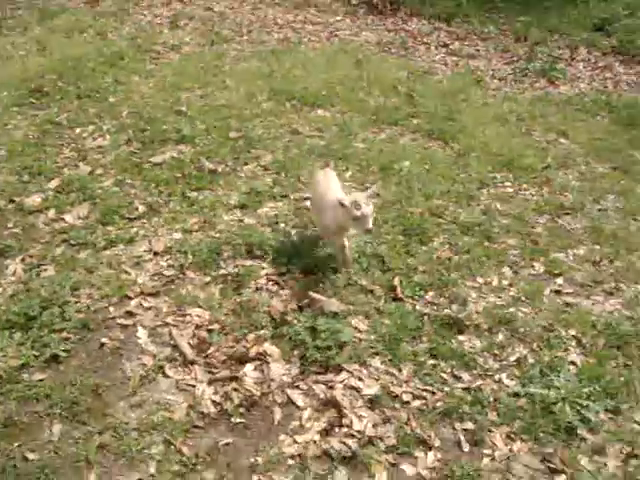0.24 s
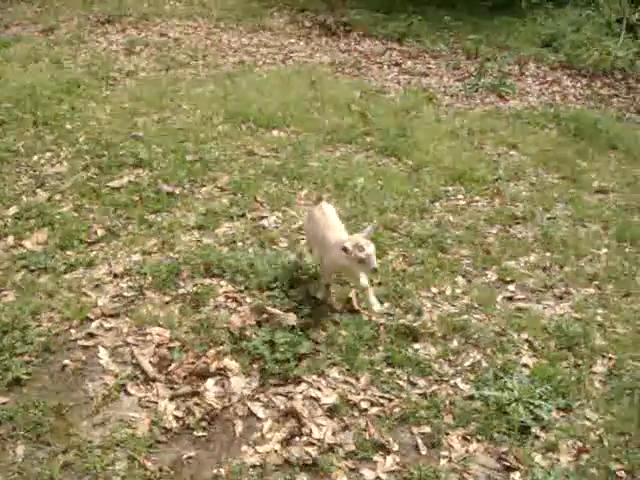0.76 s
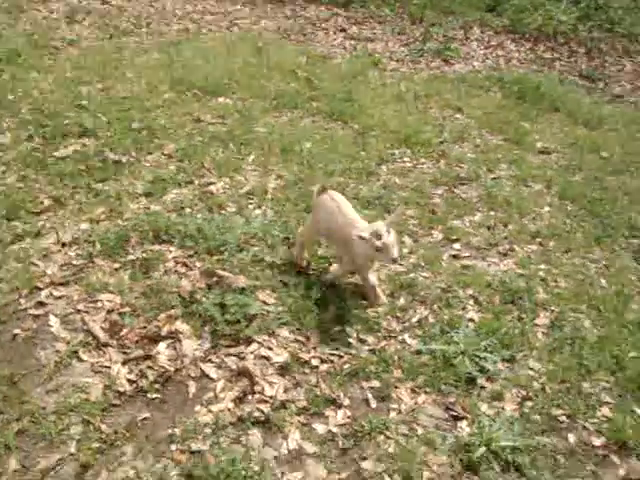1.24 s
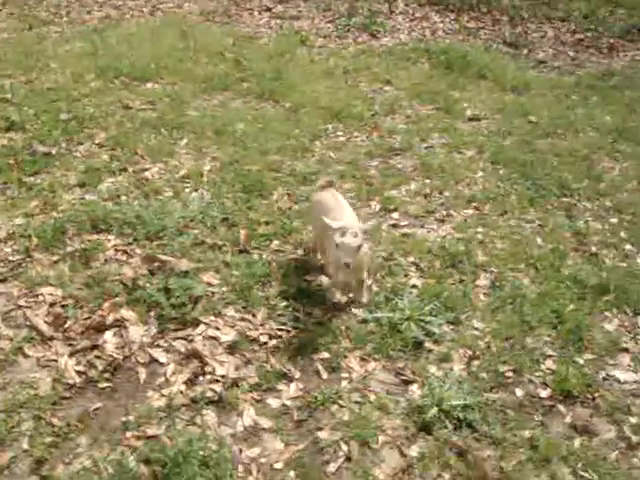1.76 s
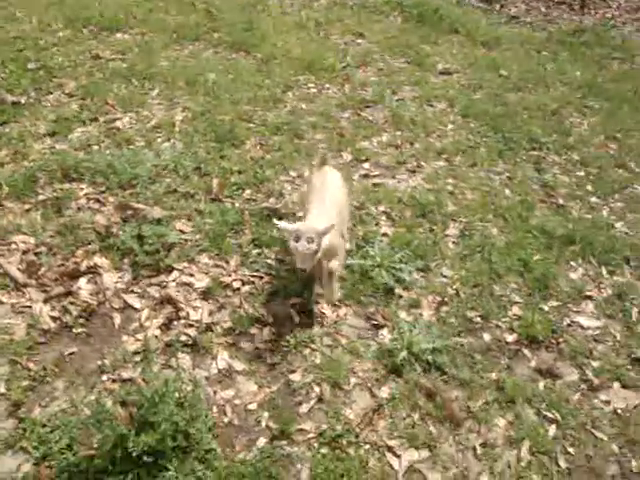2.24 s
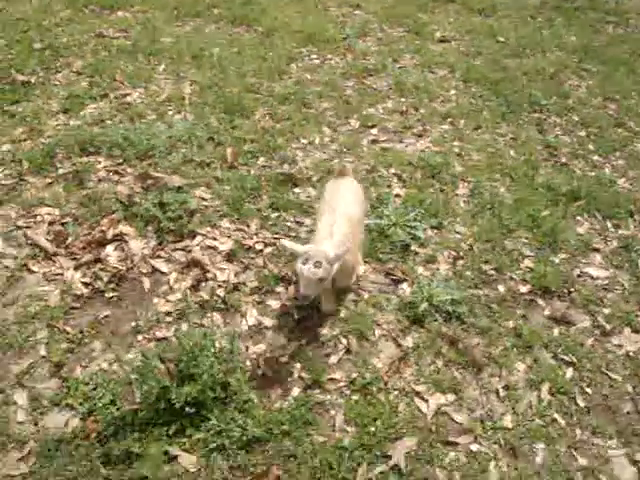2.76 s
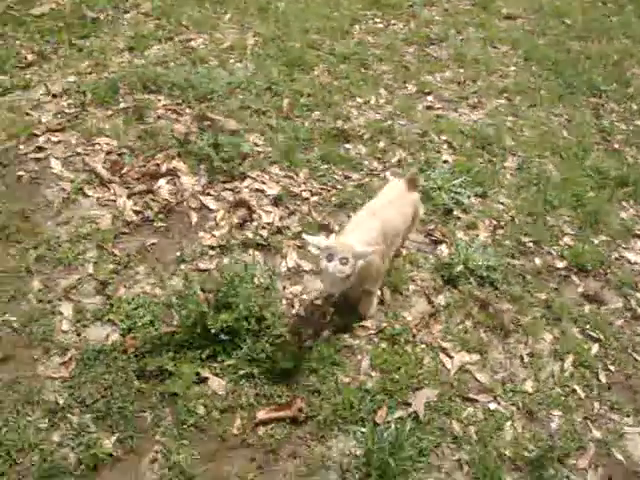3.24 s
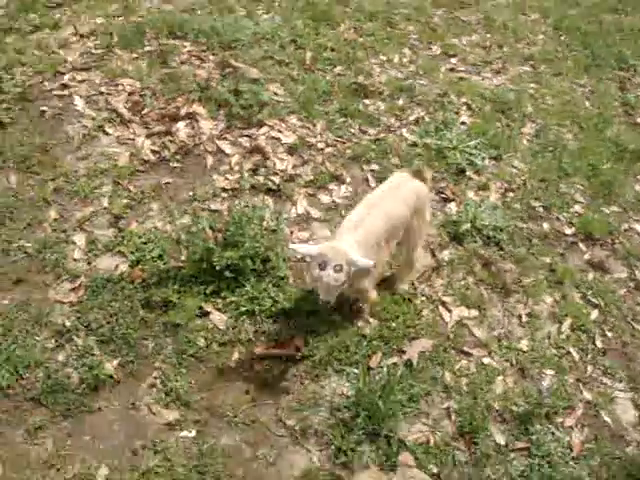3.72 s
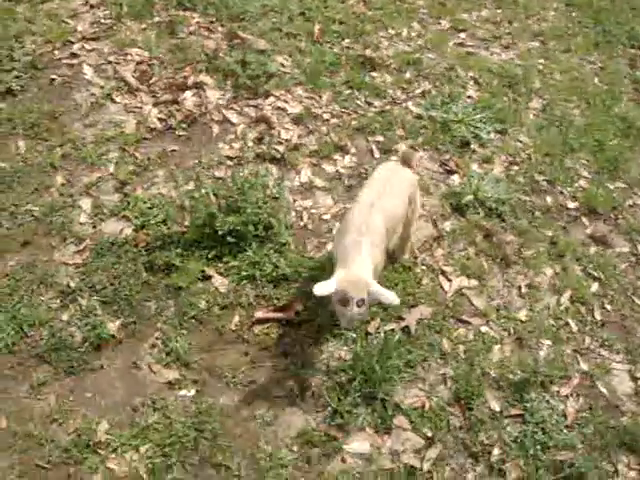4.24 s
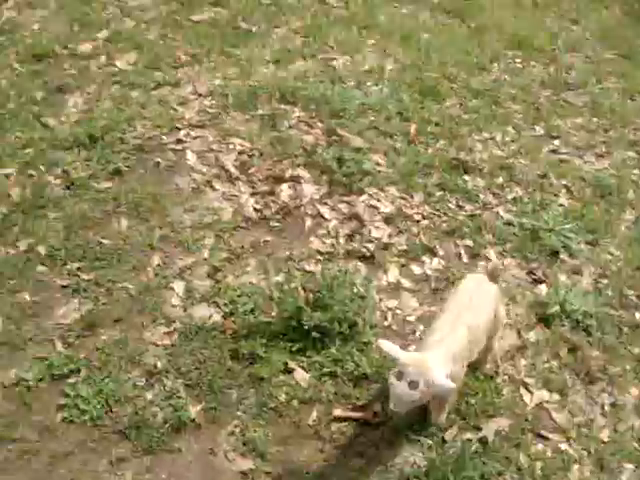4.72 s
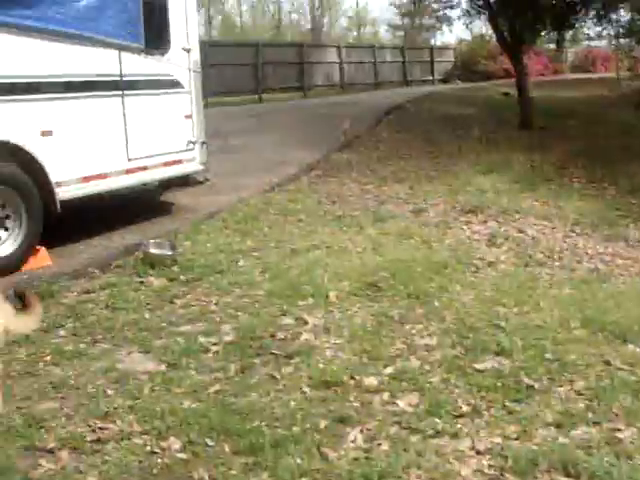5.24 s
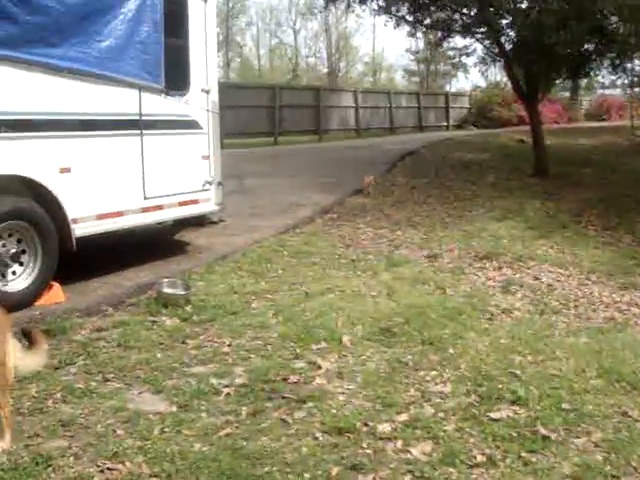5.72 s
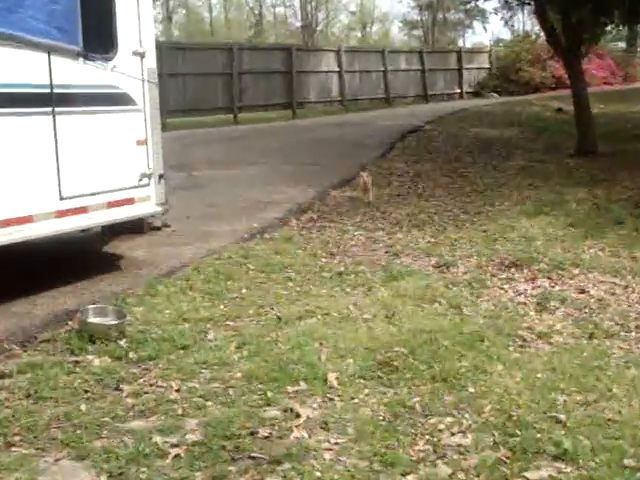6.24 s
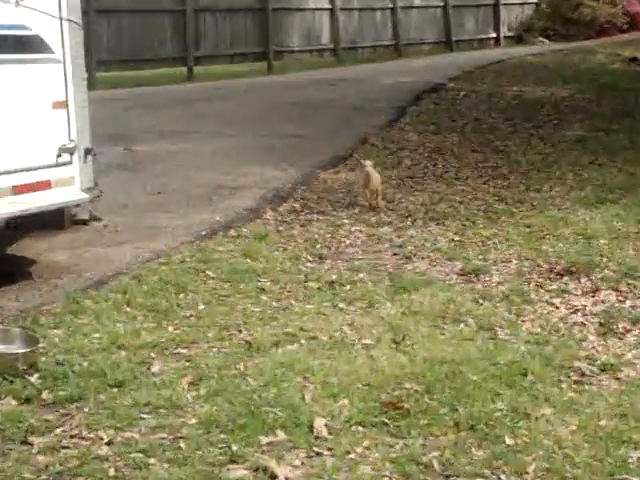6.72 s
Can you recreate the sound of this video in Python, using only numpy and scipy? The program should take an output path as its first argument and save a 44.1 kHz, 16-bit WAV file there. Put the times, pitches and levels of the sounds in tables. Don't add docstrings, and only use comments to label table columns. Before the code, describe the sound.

In an open yard, a kid goat steps through crisp leaves and bleats long and shrill, followed by repeated echoing birdsong and faint distant bleats.

```python
import sys
import numpy as np
from scipy import signal
from scipy.fft import rfft, irfft
from scipy.io import wavfile
from scipy.ndimage import uniform_filter1d, minimum_filter1d

SR = 44100
rng = np.random.default_rng(int(sys.argv[2]) if len(sys.argv) > 2 else 0)


def linear_from_db(decibels):
    return 10 ** (np.asarray(decibels, float) / 20)


def int16_out(signal):
    q = np.round(np.clip(np.atleast_2d(signal).T, -1, 1) * 32767)
    wavfile.write(sys.argv[1], SR, q.astype(np.int16))


N = 307818


def evened(x):
    return x / np.sqrt(np.mean(x ** 2) + 1e-20)


def columns(rows, t):
    s, *rest = np.transpose(rows)
    return [np.interp(t, s, c) for c in rest]


def span(rows):
    return np.arange(rows[0][0], rows[-1][0], 1 / SR)


def add(mix, s, sound):
    sound = sound[max(0, -round(s * SR)):]
    part = mix[max(0, round(s * SR)):][:len(sound)]
    part += sound[:len(part)]


def wander(n, hz):
    return evened(signal.lfilter(*signal.butter(2, hz, fs=SR), rng.standard_normal(n)))


def coloured(x, spectrum):
    hz = np.fft.rfftfreq(len(x), 1 / SR)
    f, db = np.transpose(spectrum)
    gain = linear_from_db(np.interp(np.log(hz + 1), np.log(f), db))
    return irfft(rfft(x) * gain, len(x))


def band(x, hz, width):
    b, a = signal.iirpeak(hz, hz / width, fs=SR)
    return signal.lfilter(b, a, signal.lfilter(b, a, x))


def swells(rows, t, power=1):
    swell_db = 15
    s, db, rise, fall = np.transpose(rows)[:, :, None]
    away = np.maximum((s - t) / rise, (t - s) / fall)
    return (db - swell_db * away ** power).max(0)


def hush():
    # frequency in Hz, level in dB per Hz.
    air_spectrum = [(15, -42.5), (25, -12.5), (128, 1.5), (171, 2), (228, 3.5), (492, 3), (689, 1),
                    (1060, -0.5), (1890, -3.5), (3210, -4), (5570, -10), (7260, -10.5), (7800, -20),
                    (10100, -42), (17200, -120)]
    level_db = -51 + 0.96 * wander(N, 7.6)
    return linear_from_db(level_db) * evened(coloured(rng.standard_normal(N), air_spectrum))


def motor():
    # time in seconds, level in dB.
    hum_level = [(0, -85), (.56, -65), (1.5, -66.5), (1.83, -61.5), (2.9, -72), (3.87, -62.5), (4.49, -80),
                 (5.17, -58.5), (5.37, -70), (5.52, -60.5), (6.42, -56.5), (6.98, -61)]
    motor_hz, drift = 181.9, .012
    db, = columns(hum_level, np.arange(N) / SR)
    turns = np.cumsum(motor_hz * (1 + drift * wander(N, 3))) / SR
    hum = np.cos(2 * np.pi * turns) + linear_from_db(-10.0) * np.cos(np.pi * turns)
    return np.sqrt(2) * linear_from_db(db + 0.51 * wander(N, 4.9)) * hum


def insect():
    # centre in Hz, width in Hz, level in dB.
    wing_modes = [(8750, 530, -61.5), (9400, 460, -65), (9786, 69, -73), (7920, 670, -75)]
    # time in seconds, strokes per second, level in dB.
    wing_beat = [
        (0.0, 64.1, 8),
        (5.17, 64.1, 10),
        (5.29, 65.0, 10),
        (6.98, 65.1, 9.5),
    ]
    rate, db = columns(wing_beat, np.arange(N) / SR)
    beat = .5 + .5 * np.cos(2 * np.pi * np.cumsum(rate) / SR)
    stroke = beat ** 0.2 * linear_from_db(0.76 * wander(N, 30))
    out = 0
    for k, (hz, width, mode_db) in enumerate(wing_modes):
        hiss = band(rng.standard_normal(N), hz, width)
        leak = 0.026 + 0.043 * k
        out = out + linear_from_db(mode_db) * evened(hiss * (stroke + leak))
    return out * linear_from_db(db)


def knocks():
    wood_hz = [640, 1000, 1450]
    out, u = np.zeros(N), np.arange(1500) / SR
    wood = sum(np.sin(2 * np.pi * hz * u) for hz in wood_hz)
    add(out, 5.654, linear_from_db(-41) * wood * np.exp(-u / 0.0042))
    v = 2 * np.pi * 130 * u
    add(out, 6.9662, linear_from_db(-13) * v * (1 - v / 3) * np.exp(-v))
    return out


def leaves():
    # peak in seconds, level in dB, rise and fall in seconds.
    steps = [(0, -51, .02, 0.022), (.18, -68.5, .6, 0.68), (0.321, -63, 0.0061, 0.014),
             (.45, -53, 0.039, 0.062), (.53, -64, .05, 0.083), (.88, -55.5, 0.026, 0.034),
             (.99, -55, 0.039, .015), (1.065, -55.5, 0.043, 0.041), (1.16, -77, .04, .09),
             (1.265, -58.5, 0.0064, 0.27), (1.48, -55.5, 0.13, .05), (1.575, -56, 0.11, .33),
             (2.0, -61, 0.048, 0.029), (2.15, -66, 0.56, 0.62), (2.28, -56.5, 0.044, 0.074),
             (2.41, -52, 0.0093, .03), (2.51, -55.5, 0.074, 0.026), (2.55, -63, 0.055, 0.74),
             (2.87, -59.5, 0.14, 0.83), (3.19, -58, .1, 0.017), (3.3, -73, .9, .5), (3.7, -71, 0.093, .065),
             (3.85, -67, .9, .45), (4.13, -65, .04, .1), (4.34, -67, 0.071, 0.15)]
    # frequency in Hz, level in dB per Hz.
    leaf_spectrum = [(290, -20), (500, 5), (723, -14), (922, -1.5), (2860, 5.5), (6980, 5.5), (9600, 4.5),
                     (10500, -18), (13600, -53), (22000, -120)]
    # start in seconds, peak level in dB, ring in Hz.
    twigs = [(0.32, -30.5, 7550), (0.423, -33, 6310), (0.4324, -28, 4450), (0.4568, -22.5, 2940),
             (0.4692, -22.5, 6960), (0.4799, -25.5, 4320), (0.635, -36, 2860), (0.8609, -29.5, 4800),
             (0.8767, -25.5, 5100), (0.8888, -27.5, 8270), (1.024, -32, 3046), (1.0344, -33, 3000),
             (1.0816, -31, 2830), (1.2601, -26, 3020), (1.48, -25.5, 2970), (1.504, -36, 3590),
             (3.1824, -29.5, 4520), (3.695, -29.5, 3680), (4.3433, -34.5, 3270), (4.581, -26.5, 7940),
             (4.76, -36, 3330), (5.17, -37, 3436), (5.6277, -36, 3290), (5.6546, -34.5, 3930),
             (6.4713, -37, 4900), (6.793, -26, 3300), (6.967, -18.5, 3340)]
    out, t = np.zeros(N), np.arange(0, steps[-1][0] + .5, 1 / SR)
    grain_db = 3.9 * np.minimum(rng.exponential(1, len(t)), 3)
    grains = rng.standard_normal(len(t)) * linear_from_db(grain_db) * (rng.random(len(t)) < .3)
    add(out, 0, evened(coloured(grains, leaf_spectrum)) * linear_from_db(swells(steps, t) + 12.5))
    u = np.arange(500) / SR
    for s, db, hz in twigs:
        crack = coloured(rng.standard_normal(500) * np.exp(-u / 0.0023), leaf_spectrum)
        snap = crack + 1.35 * np.sin(2 * np.pi * hz * u) * np.exp(-u / 0.0016)
        add(out, s, linear_from_db(db) * snap / abs(snap).max())
    return out


def yard(x, wet_db):
    # delay in seconds, level in dB, band centre in Hz, width in Hz.
    slaps = [
        (.0125, 0.5, 3430, 1240),
        (.039, 0, 2815, 1940),
        (0.084, -10.5, 3000, 2500),
    ]
    t60 = .55
    t = np.arange(SR) / SR
    tail = rng.choice([-1., 1.], SR) * (rng.random(SR) < 2500 / SR)
    tail *= linear_from_db(-60 * t / t60) + 2.2 * np.exp(-t / .011)
    wet = signal.fftconvolve(x, tail / np.linalg.norm(tail))[:N]
    for delay, db, hz, width in slaps:
        add(wet, delay, linear_from_db(db) * band(x, hz, width))
    return x + linear_from_db(wet_db) * wet


def birds():
    # time from the note's start in seconds, pitch in Hz, level in dB.
    slur_up = [(-.135, 1745, -23), (-.11, 1810, -16.5), (-.07, 1960, -10), (-.035, 2223, -6.5),
               (-.025, 2182, -36)]
    slur_down = [(-.004, 3570, -40), (0, 3710, -1.5), (.02, 3576, -14.5), (.045, 3200, -7),
                 (.068, 2450, -31)]
    sweep_up = [(-.115, 1270, -31), (-.06, 1650, -22), (-.025, 1830, -21.5), (-.015, 1800, -40)]
    sweep_down = [(-.004, 6750, -30), (0, 7000, -17), (.015, 6400, -12), (.04, 4340, -2),
                  (.062, 2460, -7.5), (.07, 2160, -27)]
    chip = [(0, 7630, -5.5), (.006, 6910, 0), (.014, 6370, -1), (.035, 6620, -8.5), (.045, 7060, -39)]
    # start in seconds, level in dB, pitch factor.
    slurs = [
        (3.625, -52, 1),
        (4.13, -47.5, 1),
        (4.426, -44.5, 0.98),
        (4.74, -45, 0.95),
        (5.038, -41.5, 0.99),
    ]
    sweeps = [
        (0.076, -48, 0.94),
        (5.264, -45, 0.98),
        (5.506, -44.5, 0.96),
        (5.747, -45, 0.94),
        (5.986, -44, 0.94),
        (6.225, -46, 0.9),
        (6.468, -44, 0.93),
        (6.705, -46.5, 0.95),
        (6.946, -45, 0.92),
    ]
    chips = [
        (0.512, -62, .41),
        (0.801, -60.5, 0.43),
        (1.98, -47.5, 1.03),
        (4.995, -55, 1.105),
        (5.245, -46.5, 1.03),
    ]
    out = np.zeros(N)
    for shape, notes in ((slur_up, slurs), (slur_down, slurs), (sweep_up, sweeps),
                         (sweep_down, sweeps), (chip, chips)):
        hz, shape_db = columns(shape, span(shape))
        for s, db, factor in notes:
            tone = np.sin(2 * np.pi * np.cumsum(hz * factor) / SR)
            level = linear_from_db(db + shape_db + 2.6 * wander(len(hz), 130))
            add(out, s + shape[0][0], np.sqrt(2) * level * tone)
    return out


def far_goat():
    # time in seconds, pitch in Hz, level in dB.
    calls = [
        [(5.75, 890, -72), (5.762, 903, -56), (5.798, 896, -48), (5.83, 932, -66)],
        [(5.9, 1067, -66), (5.924, 982, -47.5), (5.98, 983, -56), (6.11, 1031, -51), (6.138, 967, -47),
         (6.19, 992, -57), (6.274, 958, -50.5), (6.3, 1055, -58)],
    ]
    call_partials = [
        [0, -6, -6],
        [0, -15, -18],
    ]
    out = np.zeros(N)
    for rows, partials_db in zip(calls, call_partials):
        hz, db = columns(rows, span(rows))
        turns = np.cumsum(hz) / SR
        call = sum(linear_from_db(p) * np.cos(2 * np.pi * k * turns) for k, p in enumerate(partials_db, 1))
        add(out, rows[0][0], np.sqrt(2) * linear_from_db(db) * call * signal.windows.tukey(len(hz), .2))
    return out


def rasp(level_db, modes):
    air = rng.standard_normal(len(level_db))
    rings = sum(linear_from_db(db) * evened(band(air, hz, width)) for hz, width, db in modes)
    return rings * linear_from_db(level_db)


def syllable(rows):
    # time in seconds, hoarseness 0-1, flutter depth 0-1, half-pitch lines in dB.
    manner = [
        (2.2, .13, .15, -35),
        (2.35, .07, .58, -40),
        (2.62, .08, .7, -40),
        (2.93, .015, .03, -40),
        (3.7, .015, .03, -40),
        (3.78, .18, .4, -18),
        (3.9, .04, .1, -14),
        (4.04, .08, .2, -2),
        (4.1, .2, .42, -15),
    ]
    # peak in seconds, level in dB, rise and fall in seconds.
    pushes = [(1.765, -36, 0.078, 0.14), (1.9, -41.5, 0.23, 0.1), (2.0, -45.5, .15, 0.084),
              (2.08, -34, .05, 0.12), (2.2, -37.5, .2, .1), (2.255, -35, 0.017, 0.057),
              (2.348, -30.5, 0.087, 0.073), (2.47, -32, 0.37, 0.28), (2.679, -28, 0.082, 0.14),
              (2.79, -32, .3, 0.079), (2.97, -28.5, 0.14, 0.13), (3.22, -34, 0.1, 0.17),
              (3.375, -30, 0.07, 0.065), (3.445, -35, 0.046, 0.016), (3.522, -29, 0.05, 0.059),
              (3.62, -41, 0.11, 0.042), (3.685, -24, 0.026, 0.036), (3.73, -29.5, 0.052, 0.086),
              (3.853, -38.5, 0.1, .1), (3.96, -32, 0.067, 0.062), (4.06, -42.5, .15, 0.22)]
    # frequency in Hz, share that follows the pushes 0-1, level in dB.
    throat = [(720, 0.07, 1), (1030, 0.73, -5), (1120, 1, -1.5), (1460, 1, 1.5), (1650, 0.3, -10),
              (1863, 0.34, -12.5), (2520, 0, -31)]
    # start and end in seconds, partial number, level in dB.
    overtones = [(2.27, 2.5, 4, -53), (2.7, 2.95, 4, -53), (2.92, 3.2, 4, -45), (3.15, 3.4, 4, -49),
                 (3.36, 3.57, 4, -57), (2.45, 2.75, 4, -58), (1.77, 1.83, 7, -60), (2.08, 2.16, 6, -55),
                 (2.33, 2.82, 6, -61), (2.33, 2.72, 12, -60), (2.8, 3.11, 10, -56), (3.29, 3.52, 7, -50),
                 (3.48, 3.72, 7, -60), (3.51, 3.64, 9, -55), (3.64, 3.8, 9, -60), (3.78, 4.08, 9, -60),
                 (3.89, 3.95, 12, -62)]
    flutter_hz, ring_hz, capture_hz, pull = 32.82, 1305, 175, 8
    settle_s = 3.0
    t = span(rows)
    hz, effort_db = columns(rows, t)
    hoarse, flutter, half_db = columns(manner, t)

    off = ring_hz - 2 * hz
    pulled = np.minimum(pull * hoarse, 1) * (t < settle_s) * np.exp(-(off / capture_hz) ** 6)
    second_hz = 2 * hz + off * pulled

    flutter_rate = flutter_hz * (1 + .2 * wander(len(t), 10))
    shake = np.cos(2 * np.pi * np.cumsum(flutter_rate) / SR) * (1 + .15 * wander(len(t), 12))
    jitter = 1 + 0.15 * hoarse * wander(len(t), 73) + 0.012 * flutter * shake
    turns = np.cumsum(hz * jitter) / SR
    voice, ring_db = 0, swells(pushes, t, 2)
    for k in range(1, 5):
        share, throat_db = columns(throat, second_hz if k == 2 else k * hz)
        db = throat_db + effort_db + np.clip(share, 0, 1) * (ring_db - effort_db)
        shimmer = 1 + flutter * shake * min(k / 2, 1) + 1.2 * hoarse * wander(len(t), 100)
        own = np.cumsum(second_hz * jitter) / SR if k == 2 else k * turns
        voice = voice + linear_from_db(db) * shimmer * np.cos(2 * np.pi * own)
        if k > 1:
            half_line = np.cos(2 * np.pi * (k - .5) * turns)
            voice = voice + linear_from_db(db + half_db - 8.2 * (k == 2)) * half_line
    for start, end, k, db in overtones:
        if start >= t[-1] or end <= t[0]:
            continue
        gate = np.clip(np.minimum(t - start, end - t) / .04, 0, 1)
        level = linear_from_db(db + 1.3 * wander(len(t), 45))
        voice = voice + gate * level * np.cos(2 * np.pi * k * turns)
    return np.sqrt(2) * voice * signal.windows.tukey(len(t), 0.013 / (t[-1] - t[0]))


def near_goat():
    # time in seconds, pitch in Hz, effort in dB.
    stammer = [
        [(1.68, 522.5, -57), (1.734, 536, -44), (1.75, 622, -40), (1.77, 658, -43), (1.854, 643, -38),
         (1.921, 576, -55), (1.965, 646, -60), (2.033, 647, -57)],
        [(2.035, 523, -47), (2.051, 583, -46), (2.065, 622, -33.5), (2.077, 655, -43), (2.147, 623, -33),
         (2.231, 589, -67.5)],
    ]
    long_call = [
        [(2.232, 556, -44.5), (2.25, 635, -33.5), (2.28, 703, -47), (2.348, 676.2, -38), (2.414, 663, -45.5),
         (2.47, 654, -35.5), (2.7, 660, -35.5), (2.73, 621.4, -31.5), (2.815, 650, -45)],
        [(2.81, 637, -39), (2.865, 656, -41.5), (3.126, 658.5, -43), (3.2, 658.7, -50.5), (3.33, 656.6, -48),
         (3.395, 650, -55.5), (3.61, 640, -44), (3.647, 634, -53), (3.765, 613.4, -34)],
        [(3.765, 556.5, -35), (3.801, 518.3, -43), (3.853, 510, -36), (3.905, 499, -49), (3.965, 498.8, -41),
         (4.014, 485.3, -45.5), (4.09, 469, -51), (4.12, 449, -58), (4.212, 441, -67)],
    ]
    # peak in seconds, level in dB, rise and fall in seconds.
    onset_air = [
        (1.726, -45, 0.052, 0.32),
        (1.89, -40.5, 0.048, 0.028),
        (2.036, -42, 0.0082, .04),
        (2.08, -46, 0.056, 0.39),
        (2.248, -43, .28, 0.076),
    ]
    # centre in Hz, width in Hz, level in dB.
    rasp_modes = [(1061, 29, 4), (955, 91, -5), (1170, 110, 0), (1530, 160, -7), (1827, 100, -2.5),
                  (2880, 65, -11.5)]
    # time in seconds, level in dB.
    wheeze = [(4.07, -62), (4.11, -42), (4.196, -46), (4.22, -52), (4.29, -54), (4.376, -68), (4.4, -55)]
    # centre in Hz, width in Hz, level in dB.
    wheeze_modes = [(1390, 34, -1.5), (1311, 93, 2), (1694, 75, -9)]
    out = np.zeros(N)
    for rows in stammer + long_call:
        add(out, rows[0][0], syllable(rows))
    t = span(stammer[0] + long_call[0])
    add(out, t[0], rasp(swells(onset_air, t), rasp_modes))
    wheeze_db, = columns(wheeze, span(wheeze))
    add(out, wheeze[0][0], rasp(wheeze_db, wheeze_modes))
    return out


def scene():
    background = hush() + motor() + insect() + knocks() + leaves()
    bird = yard(birds(), 5.5)
    goats = yard(far_goat() + near_goat(), -12)
    return (background + bird + goats)[None]


def starve(x):
    margin_db, edge_hz = 7.5, 3500
    hz, _, z = signal.stft(x, SR, nperseg=256, noverlap=128)
    power = (abs(z[:128]) ** 2).reshape(32, 4, -1).sum(1)
    power = uniform_filter1d(power, size=2, axis=1)
    near = -minimum_filter1d(-power, size=9, axis=1, origin=-1)
    loud_enough = np.repeat(power * linear_from_db(2 * margin_db) > near, repeats=4, axis=0)
    keep = loud_enough | (hz[:128, None] < edge_hz)
    return signal.istft(z * np.vstack([keep, keep[-1:]]), SR, nperseg=256, noverlap=128)[1][:N]


def roll_off(x):
    return signal.sosfilt(signal.butter(12, 11060, fs=SR, output="sos"), x)


def record(dry):
    edge = signal.firwin(301, 10250, window=("kaiser", 8), fs=SR)
    mix = signal.oaconvolve(starve(dry[0])[None], edge[None], "same")
    return roll_off(mix)


dry = scene()
out = record(dry)
int16_out(out)
```